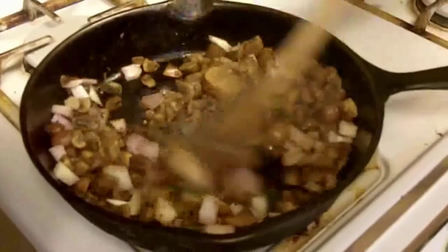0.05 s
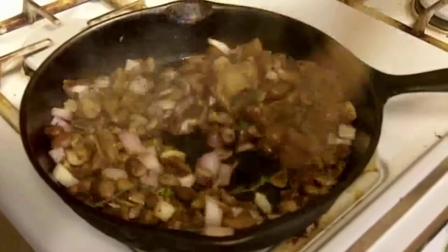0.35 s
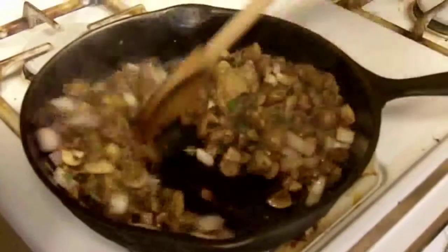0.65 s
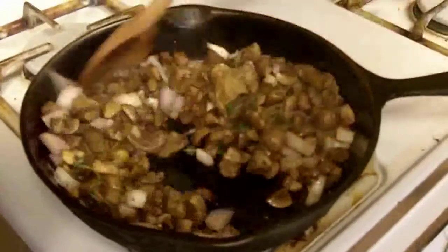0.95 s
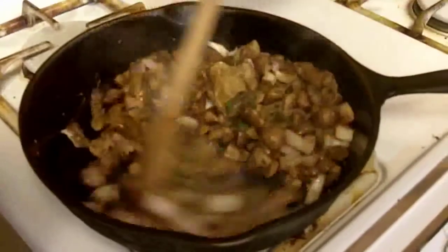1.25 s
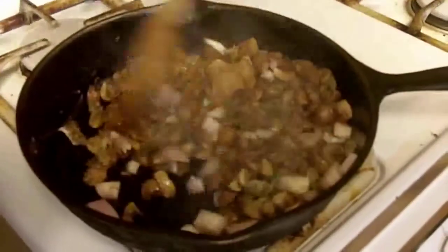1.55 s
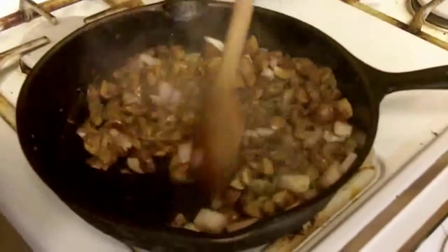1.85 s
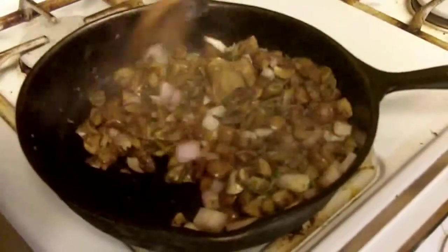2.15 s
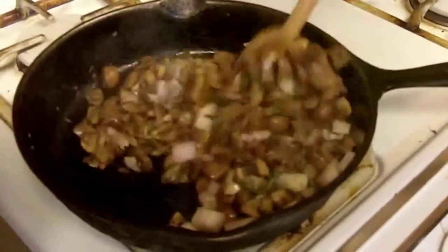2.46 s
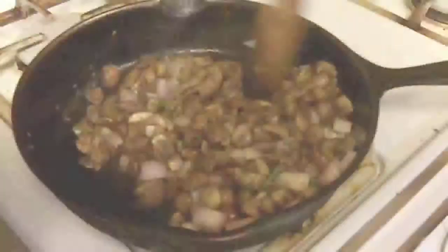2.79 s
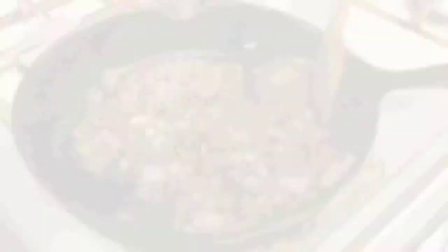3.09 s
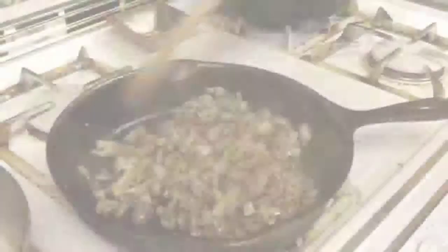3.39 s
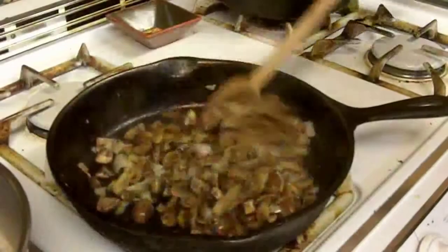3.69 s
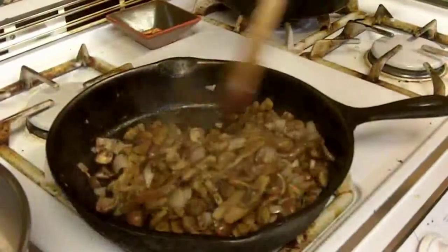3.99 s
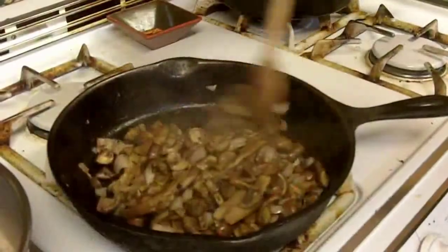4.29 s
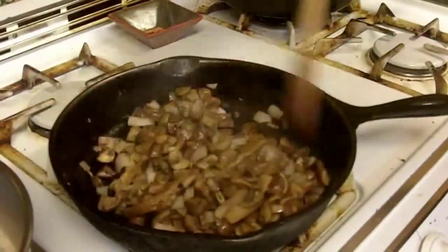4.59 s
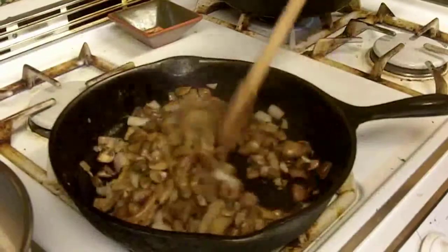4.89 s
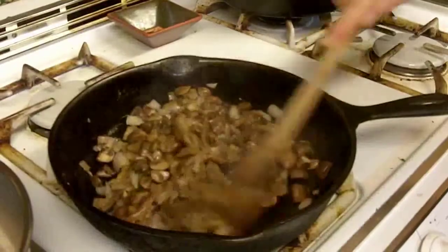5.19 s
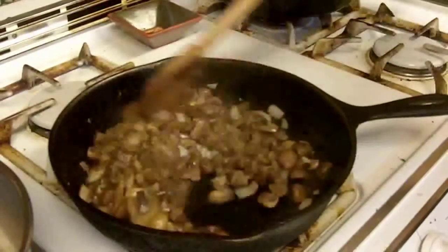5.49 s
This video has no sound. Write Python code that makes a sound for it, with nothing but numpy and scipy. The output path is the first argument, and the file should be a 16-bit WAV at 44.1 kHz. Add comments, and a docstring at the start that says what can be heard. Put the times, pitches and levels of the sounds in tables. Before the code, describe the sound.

Mushrooms and shallots sizzle steadily in a cast iron skillet, heard close up in a small kitchen. A wooden spoon turns the food with soft wet squelches and knocks irregularly on the iron, each dry clack leaving a short ring. A little past halfway the frying grows slightly louder and the strongest knocks come close together. Two more follow near the end. Fat spits now and then over a low stove rumble.

```python
"""Mushrooms and shallots sizzling in a cast iron skillet on a kitchen stove, close to one mono microphone.
Steam bubbles burst over a hiss, wet pieces squelch and the stove rumbles, all swelling with the stirring.
A wooden spoon drags over the iron and knocks against it: a dry clack, then a short ring that depends on
where the pan is struck. Now and then a drop of fat spits. Hob, wall and room answer briefly."""
import sys
import numpy as np
from scipy import signal
from scipy.fft import rfft, irfft
from scipy.io import wavfile

SR = 44100
rng = np.random.default_rng(int(sys.argv[2]) if len(sys.argv) > 2 else 0)


def persist_wave(psi):
    """Save psi, clipped to +-1, as 16-bit WAV."""
    counts = np.round(np.clip(psi, -1, 1) * 32767).astype(np.int16)
    wavfile.write(sys.argv[1], SR, np.atleast_2d(counts).T)


N = 253470
TIME = np.arange(N) / SR


def from_db(db):
    """Decibels to gain."""
    return 10 ** (np.asarray(db) / 20)


def unit_rms(x):
    """Scale to rms 1."""
    return x / np.sqrt(np.mean(x ** 2) + 1e-20)


def at_hz(hz, known_hz, values):
    """Read a table along log frequency."""
    return np.interp(np.log(np.maximum(hz, 1)), np.log(known_hz), values)


def coloured(x, spectrum):
    """Shape a signal with a spectrum; rms 1."""
    hz = np.arange(N // 2 + 1) * SR / N
    return unit_rms(irfft(rfft(x) * from_db(at_hz(hz, *np.transpose(spectrum))), N))


def low_pass(x, hz, order):
    """Round off the top."""
    return signal.sosfilt(signal.butter(order, min(hz, 20000), fs=SR, output="sos"), x)


def drift(per_s):
    """Glide between random values; rms 1."""
    knots = rng.standard_normal(4000)
    return unit_rms(np.interp(TIME * per_s, np.arange(len(knots)), knots))


def grains(per_s, spread_db):
    """Random clicks of uneven size and either sign."""
    sizes = from_db(spread_db * np.minimum(rng.exponential(1, N), 5)) * rng.choice([-1, 1], N)
    return unit_rms(sizes * (rng.random(N) < per_s / SR))


def ringing(hz, level_db, t60):
    """One second of decaying sines, started together with alternating signs."""
    t = TIME[:SR, None]
    modes = np.sin(2 * np.pi * hz * t) * from_db(-60 * t / t60)
    return modes @ (from_db(level_db) * (-1) ** np.arange(len(hz)))


def add(out, s, sound):
    """Mix a sound in at a time."""
    start = max(round(s * SR), 0)
    out[start:start + len(sound)] += sound[:N - start]


# frying, heard close to the pan: f/Hz, level/dB
SIZZLE_SPECTRUM = [(300, -29), (900, 2), (1500, -11), (2000, 0), (3000, 4.5), (3800, 2), (5000, -6),
                   (7000, -6.5), (10000, -9), (12500, -12), (15000, -23.5)]

def sizzle(level_db, per_s=5000, hiss_db=-1, gain_db=7.5, flutter_db=0.88):
    """Steam bubbles burst over a smooth hiss; fresh contact with the iron makes more of them."""
    bursts = grains(per_s * from_db(level_db - np.mean(level_db)), spread_db=3)
    hiss = from_db(hiss_db) * rng.standard_normal(N)
    envelope = from_db(level_db + gain_db + flutter_db * drift(per_s=40))
    return envelope * coloured(bursts + hiss, SIZZLE_SPECTRUM)


# wet food moving in the pan: f/Hz, level/dB
SQUELCH_SPECTRUM = [(150, -31), (350, -5.5), (650, 4), (1000, 5), (1350, 7), (1650, 4.5), (2100, -3.5),
                    (4000, -41)]

def squelch(level_db, per_s=1500, cycles=10):
    """Wet pieces slide and tumble: small juicy pops over the soft rub of the spoon."""
    pops = np.zeros(N)
    pitches_hz = np.geomspace(380, 1900, num=16)
    for hz in pitches_hz:
        decay = from_db(-60 * hz / (cycles * SR))
        angle = 2 * np.pi * hz / SR
        clicks = grains(per_s / len(pitches_hz), spread_db=-2)
        pops += signal.lfilter([np.sin(angle)], [1, -2 * decay * np.cos(angle), decay**2], clicks + 1e-18)
    juice = coloured(np.diff(pops, prepend=0), SQUELCH_SPECTRUM)
    rub = coloured(rng.standard_normal(N), SQUELCH_SPECTRUM)
    return from_db(level_db) * unit_rms(juice + rub)


# the stove under the pan: f/Hz, level/dB
RUMBLE_SPECTRUM = [(10, -35), (25, 3), (50, 3.5), (90, -3.5), (160, -6.5), (300, -10), (600, -12.5),
                   (1500, -52)]

def stove_rumble(level_db, shake_db=-23, shake_t60=1.16):
    """A low rumble that swells for a moment whenever a knock shakes the stove."""
    power = from_db(level_db) ** 2
    for s, thud_db, *_ in SPOON_KNOCKS:
        add(power, s, from_db(thud_db + shake_db - 60 * TIME[:SR] / shake_t60) ** 2)
    return np.sqrt(power) * coloured(rng.standard_normal(N), RUMBLE_SPECTRUM)


# centres of a knock's bass, thud, clack and edge bands: f/Hz
KNOCK_BANDS = [200, 640, 1230, 2900]
# quickly damped modes of the spoon pressed on the iron: f/Hz, level/dB, t60/s
SPOON_MODES = [(86, -2.5, 0.02), (166.6, -10.5, 0.13), (322, -13.5, 0.14), (462.3, -6, 0.14),
               (643, 1, 0.16), (825.5, 1, 0.026), (1207, -2, 0.029), (1332, -1, 0.015),
               (1720, -3.5, 0.0045), (2700, -7, 0.0078), (2815, -7.5, 0.011), (3060, -7, 0.02),
               (3830, -11, 0.014), (4080, -12.5, 0.023), (6880, -18.5, 0.043)]

def spoon_clack(bands_db):
    """Wood meets iron: the spoon's modes, shifting with grip and angle, plus a crunch and a crack."""
    hz, level_db, t60 = np.transpose(SPOON_MODES)
    grip = np.exp(rng.normal(0, .015, len(hz)))
    wood = ringing(hz * grip, level_db + at_hz(hz, KNOCK_BANDS, bands_db), t60)
    add(wood, 0, crunch(bands_db))
    add(wood, 0, crack(bands_db[-1]))
    return wood


# colour of the crushing contact: f/Hz, level/dB
CRUNCH_SPECTRUM = [(40, -18), (200, 28), (330, 21), (750, 24), (1000, -14), (1250, -3), (1650, 16.5),
                   (2200, 3), (3700, 14), (5000, -28.5), (7000, 0), (11000, -19)]

def crunch(bands_db, gain_db=-7, t60=0.03):
    """Wood fibres and grit crush at the contact: a short burst of noise in the colour of the clack."""
    size = SR // 8
    hz = np.arange(size // 2 + 1) * SR / size
    shape_db = at_hz(hz, KNOCK_BANDS, bands_db) + at_hz(hz, *np.transpose(CRUNCH_SPECTRUM))
    noise = irfft(rfft(rng.standard_normal(size)) * from_db(shape_db), size)
    return noise * from_db(gain_db - 60 * TIME[:size] / t60)


def crack(level_db, hz=2800, t60=0.0058, gain_db=5):
    """The first instant of contact: a sharp snap of a few cycles."""
    t = TIME[:SR // 20]
    return -np.sin(2 * np.pi * hz * t) * from_db(level_db + gain_db - 60 * t / t60)


# modes of the skillet: f/Hz, level/dB, t60/s
SKILLET_MODES = [(281.5, 0, .3), (490, 0, .55), (662, 0, .6), (738, -10, .6), (799, -13, .3),
                 (1023, -19, .4), (1188, 0, .5), (1505, -8, .3), (1725, -20, .35), (1848, -19, .3),
                 (2131, 0, .47), (2199, -12, .3), (2307, -6, .45)]
# high modes that a hard knock wakes: f/Hz, level/dB relative to the clack, t60/s
HIGH_MODES = [(2785, -25, .35), (3008, -32, .25), (3515, -32, .25), (3585, -32, .3)]
# how strongly each spot wakes the iron: f/Hz, floor level/dB, wall level/dB, rim level/dB
STRIKE_SPOTS = [(281, -10.5, -13.5, -11), (490, 1.5, -18, -7.5), (700, -2, 2, -10), (1220, -10.5, -8, 0.5),
                (1490, -13, -13, -3.5), (2190, -22, -16.5, -4.5)]

def skillet_ring(ring_db, spot, length, edge_db, bands_db, detune_hz=10, twin_db=-9):
    """The iron rings; the spot struck weights the modes, and a spoon left resting shortens them."""
    hz, mode_db, t60 = np.transpose(SKILLET_MODES)
    spot_hz = [row[0] for row in STRIKE_SPOTS]
    spot_db = [ring_db + np.interp(spot, [0, 1, 2], row[1:]) for row in STRIKE_SPOTS]
    spot_db[-1] += edge_db
    level_db = mode_db + at_hz(hz, spot_hz, spot_db) + rng.normal(0, 1, len(hz))
    # each mode has a quieter, slightly detuned twin, so the ring wavers
    twin_hz = hz + detune_hz * rng.choice([-1, 1], len(hz)) * rng.uniform(0.58, 1.48, len(hz))
    pairs = ringing(hz, level_db, t60 * length) + ringing(twin_hz, level_db + twin_db, t60 * length)
    # the heavy iron takes a moment to get going, then its first swing falls away quickly into a slower tail
    rise = 1 - np.exp(-TIME[:SR] / 0.0091)
    fall = from_db(-7) + from_db(-60 * TIME[:SR] / 0.51)
    high_hz, high_db, high_t60 = np.transpose(HIGH_MODES)
    highs = ringing(high_hz, high_db + at_hz(high_hz, KNOCK_BANDS, bands_db), high_t60)
    return rise * fall * pairs + highs


# spoon on skillet: t/s, thud level/dB, clack level/dB, ring level/dB,
# spot (0 floor, 1 wall, 2 rim), contact hardness as cutoff f/Hz, ring length factor
SPOON_KNOCKS = [(0.04, -28, -6.5, -36.5, 1.37, 2060, 1.4), (0.4389, -25, -15, -27.5, 1.02, 6900, 1.25),
                (.594, -42, -29.5, -55, 1.2, 1900, .5), (.632, -43, -36, -43, 1, 1900, .35),
                (.730, -52, -52, -43.5, 0.1, 1500, 0.29), (0.942, -31.5, -19, -28.5, 0.93, 3150, 1.2),
                (1.085, -40.5, -36, -56, 1.9, 2600, .3), (1.293, -42, -36, -71, 2.3, 2000, .6),
                (1.6949, -28, -21.5, -35, .15, 3000, 2), (2.095, -31.5, -20.5, -37.5, 0.41, 2860, 1.5),
                (2.961, -38.5, -22, -42, 0.24, 3340, 1.8), (3.091, -45, -53, -39, 0.14, 1200, 0.46),
                (3.22, -26, -14, -34, 2.8, 2040, 5.8), (3.479, -21, -6.5, -21, 1.9, 2770, 1.45),
                (3.584, -21, -8, -26.5, 1.53, 2200, 1.75), (3.735, -43, -32, -45, 1.4, 1400, 0.51),
                (4.272, -59, -49, -45.5, 0.031, 1490, 2.3), (4.7255, -22, -21, -33, 0.65, 2770, 2.76),
                (5.1428, -24, -12.5, -27.5, 1.01, 5360, 2.37)]

def knocks(usual_hardness_hz=3070, edge_db_per_octave=9.5):
    """Each knock is a woody clack and an iron ring; a harder contact gains treble."""
    clacks, rings = np.zeros((2, N))
    for s, thud_db, clack_db, ring_db, spot, hardness_hz, length in SPOON_KNOCKS:
        edge_db = edge_db_per_octave * np.log2(hardness_hz / usual_hardness_hz)
        bands_db = [thud_db - 10.5, thud_db, clack_db, clack_db - 15 + edge_db]
        clack = spoon_clack(bands_db)
        ring = skillet_ring(ring_db, spot, length, edge_db, bands_db)
        # food caught between wood and iron cushions the blow
        add(clacks, s, low_pass(clack + 1e-18, hardness_hz, order=4))
        add(rings, s, low_pass(ring, hardness_hz, order=4))
    return clacks, rings


def kitchen(x, gap_s=0.0026, early_db=-5, early_t60=0.13, late_db=-11, late_t60=.35, wall_cut_hz=9000):
    """Reflections off the hob and the wall behind it reach the microphone, then the room's short tail."""
    t = TIME[:SR // 2]
    echoes = 0
    for level_db, t60 in ((early_db, early_t60), (late_db, late_t60)):
        tail = rng.standard_normal(len(t)) * from_db(-60 * t / t60) * (t > gap_s)
        echoes += from_db(level_db) * tail / np.linalg.norm(tail)
    return signal.fftconvolve(x, low_pass(echoes, wall_cut_hz, order=1))[:N]


# the spoon turns the food over: start t/s, length/s, effort (0-1)
STIR_STROKES = [(0.264, 1, 0.32), (0.893, 0.81, 0.34), (1.652, 0.38, 0.41), (2.1, 0.93, .45),
                (2.986, 0.41, 0.44), (3.243, 0.12, 1), (3.46, 0.5, 0.89), (4.285, 0.16, 0.34),
                (4.668, 0.56, 0.47), (5.088, 0.57, 0.65), (5.55, .55, 0.42)]

def stirring(push_share=0.29):
    """The effort of each stroke builds while the spoon pushes and fades as the food settles."""
    return sum(np.interp(TIME, [s, s + push_share * length, s + length], [0, effort, 0])
               for s, length, effort in STIR_STROKES)


# spoon dragged over the iron: start t/s, end t/s, level/dB
SPOON_DRAGS = [(1.07, 1.152, -48.5), (2.115, 2.234, -42), (2.277, 2.556, -53), (3.245, 3.34, -38.5),
               (3.7, 3.812, -45.5)]

def drags(slips_per_s=450, t60_factor=0.2, dull_hz=950):
    """The spoon sticks and slips; each slip nudges the pan's modes, which the pressed wood keeps short."""
    hz, level_db, t60 = np.transpose(SKILLET_MODES)
    slips = grains(slips_per_s, spread_db=4)
    scrape = signal.fftconvolve(slips, ringing(hz, level_db, t60 * t60_factor))[:N]
    envelope = sum(from_db(db) * np.sin(np.pi * np.clip((TIME - start) / (end - start), 0, 1))
                   for start, end, db in SPOON_DRAGS)
    return envelope * unit_rms(low_pass(scrape, dull_hz, order=2))


# drops of fat bursting in the pan: t/s, level/dB
FAT_SPITS = [(1.104, -32), (1.885, -47), (2.0128, -30.5), (3.524, -27), (3.925, -31.5), (5.25, -32)]

def spits(typical_hz=2100, t60=0.0059, snap_db=-2, top_hz=4000):
    """A bursting drop is a tiny snap with a few cycles of ring."""
    out = np.zeros(N)
    t = TIME[:SR]
    for s, level_db in FAT_SPITS:
        hz = typical_hz * np.exp(rng.normal(0, 0.32))
        pop = np.sin(2 * np.pi * hz * t)
        snap = from_db(snap_db) * rng.standard_normal(SR)
        add(out, s, from_db(level_db - 60 * t / t60) * (pop + snap))
    return low_pass(out + 1e-18, top_hz, order=1)


# pan and stove between strokes: t/s, sizzle level/dB, rumble level/dB
RESTING_LEVELS = [(0, -60.5, -65), (3.12, -60.2, -60), (3.25, -58.5, -53.5), (5.75, -58.5, -59.5)]

def scene(ring_send_db=-11, squelch_db=-52.5, sizzle_swell_db=4, squelch_swell_db=8, rumble_swell_db=7):
    """At the stove: knocks, drags and spits over frying, squelch and rumble that swell with each stroke."""
    s, *columns = np.transpose(RESTING_LEVELS)
    sizzle_db, rumble_db = [np.interp(TIME, s, column) for column in columns]
    effort = stirring()
    clacks, rings = knocks()
    sharp = clacks + spits()
    rumble = stove_rumble(rumble_db + rumble_swell_db * effort)
    room = kitchen(sharp + from_db(ring_send_db) * rings)
    food = sizzle(sizzle_db + sizzle_swell_db * effort) + squelch(squelch_db + squelch_swell_db * effort)
    return (sharp + rings + drags() + room + food + rumble)[None]


# the level sits slightly off centre; at 3.22 s the offset steps higher: t/s, offset/full scale
DC_OFFSET = [(0, .014), (3.219, .014), (3.221, .0356)]

def record(dry, ceiling=.6, cutoff_hz=15000):
    """A small mono recorder rounds the loudest peaks and cuts the top; an offset is added."""
    rounded = ceiling * np.tanh(dry / ceiling)
    cut = signal.sosfilt(signal.ellip(10, .1, 80, cutoff_hz, fs=SR, output="sos"), rounded)
    return cut + np.interp(TIME, *np.transpose(DC_OFFSET))


dry = scene()
out = record(dry)
persist_wave(out)
```